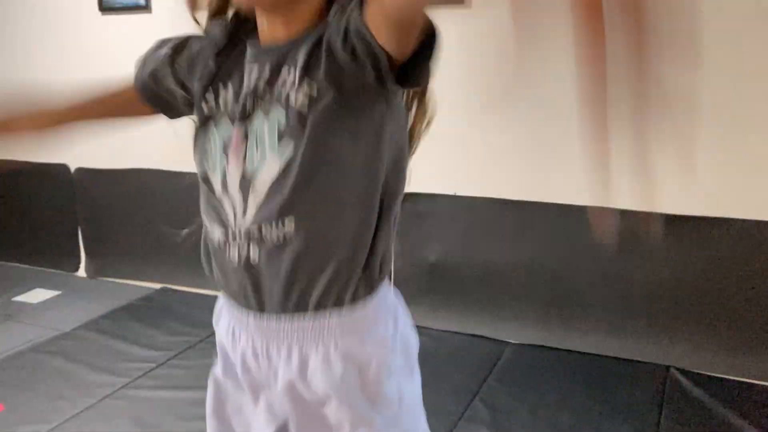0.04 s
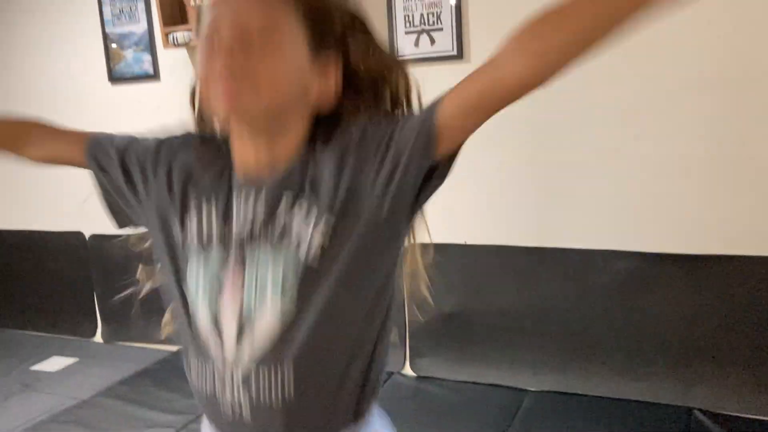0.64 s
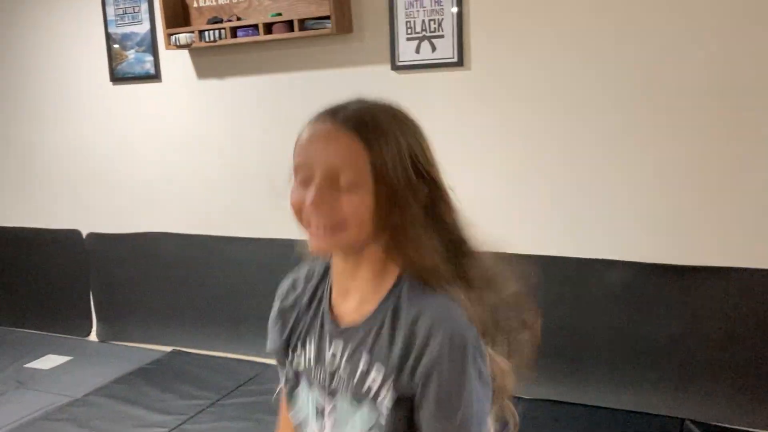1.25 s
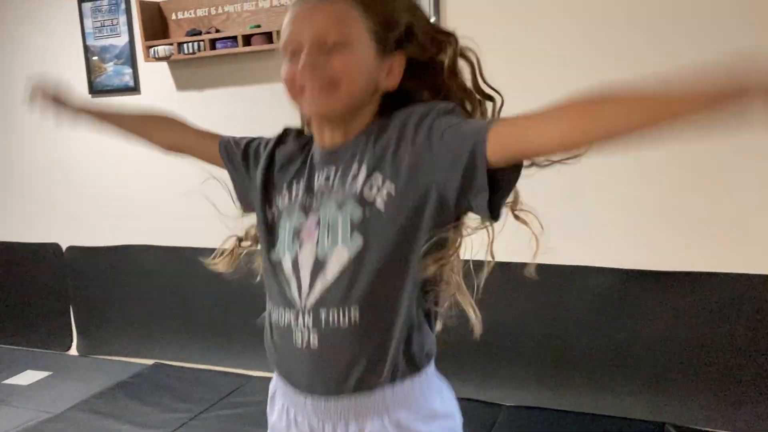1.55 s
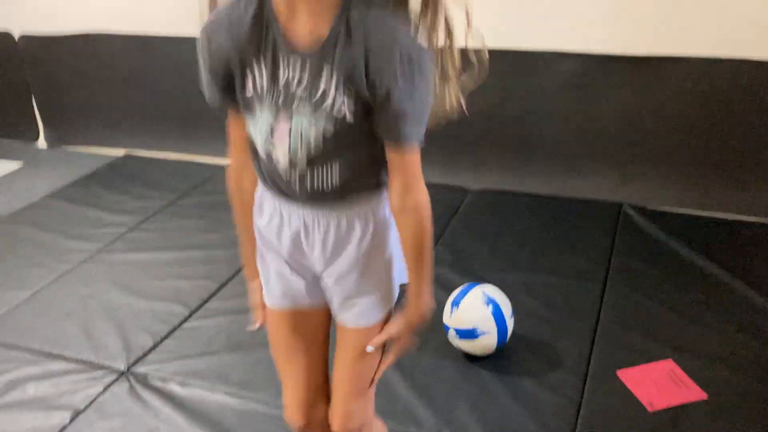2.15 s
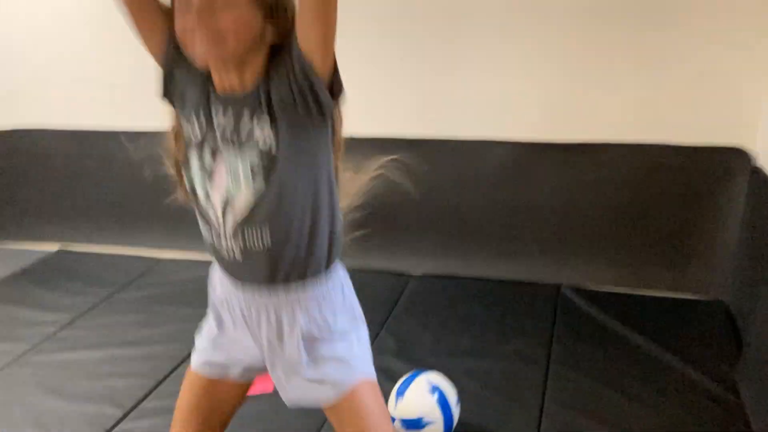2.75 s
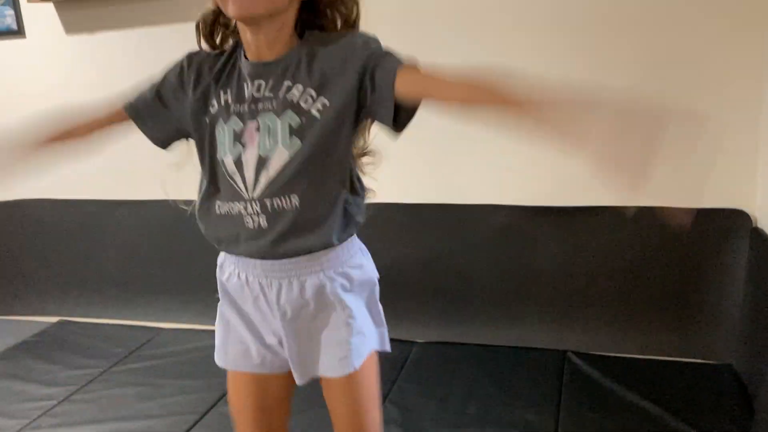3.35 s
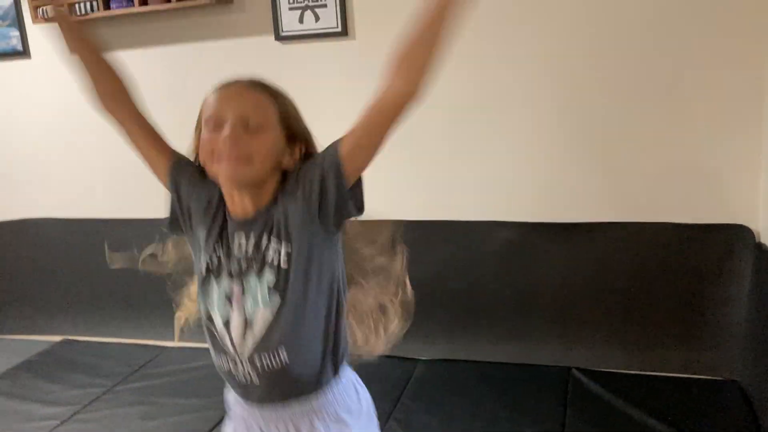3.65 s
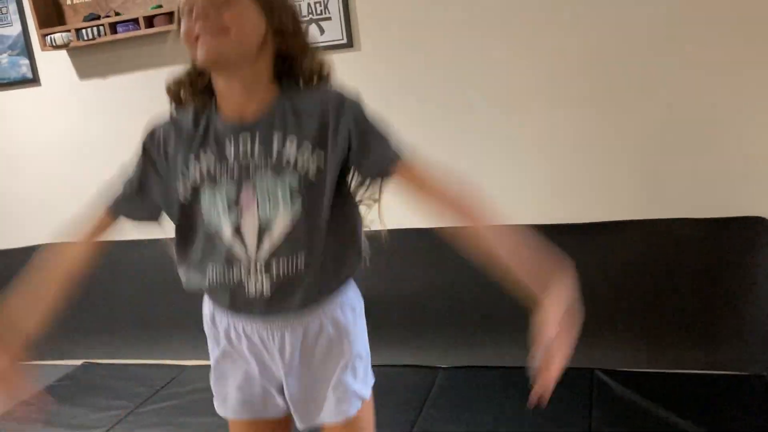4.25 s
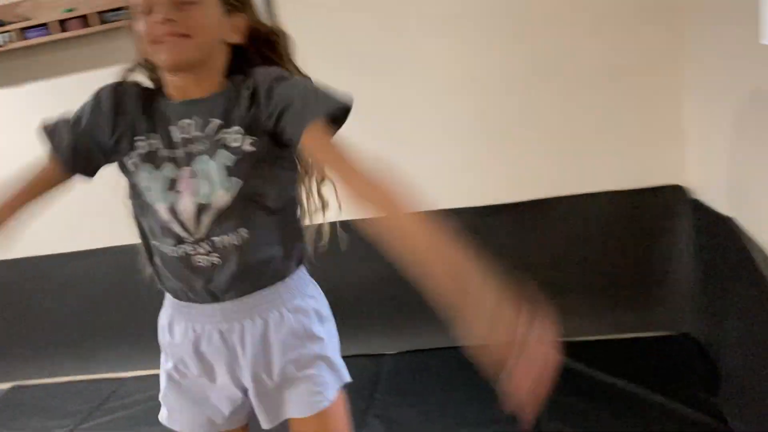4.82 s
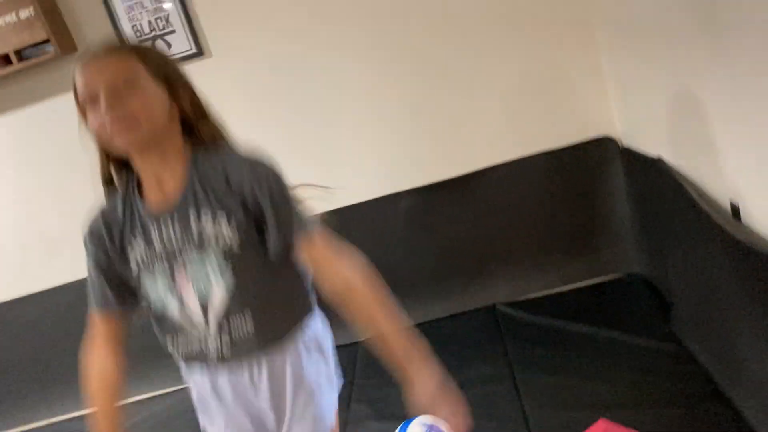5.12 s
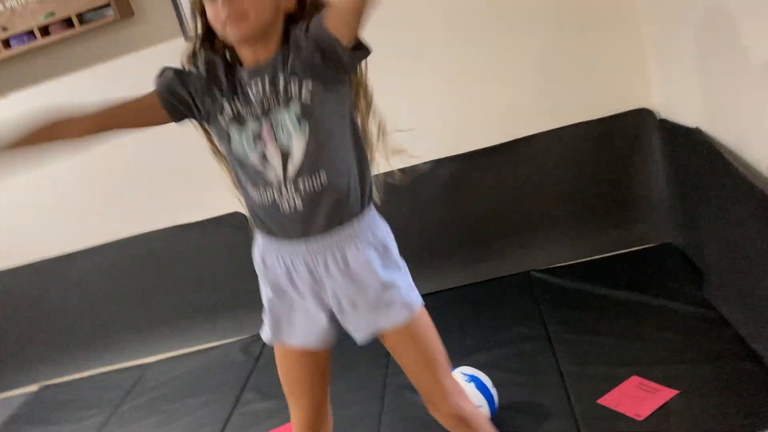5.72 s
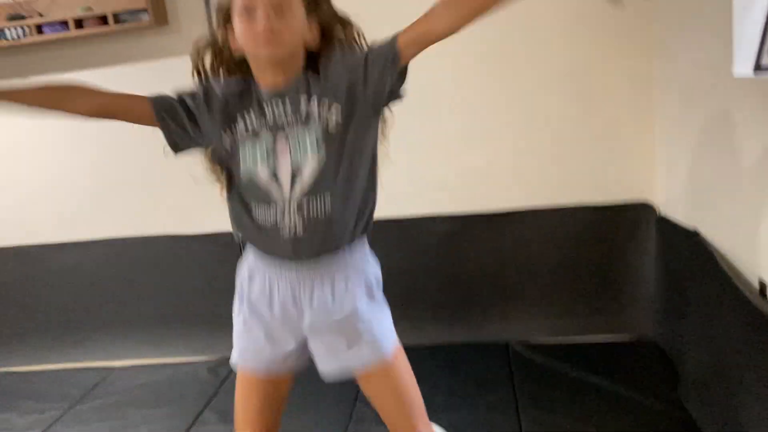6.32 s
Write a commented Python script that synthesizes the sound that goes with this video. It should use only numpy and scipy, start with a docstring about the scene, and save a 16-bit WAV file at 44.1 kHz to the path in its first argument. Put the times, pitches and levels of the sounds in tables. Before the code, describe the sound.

Bare feet thud steadily on padded gym mats during jumping jacks, with hands slapping thighs on every second landing.

```python
"""Bare feet pat on vinyl and thud into foam mats: a child does jumping jacks nearby in a small room.
Each footfall is an impact that sets the foam into a damped oscillation. On every second landing the
hands slap the thighs, and the trapped air resonates. Friction makes shirt and hair swish as the arms
swing, and skin squeak on the vinyl. The walls reverberate briefly over a steady ventilation rumble."""
import sys
import numpy as np
from scipy import signal
from scipy.fft import rfft, irfft, next_fast_len
from scipy.io import wavfile
from scipy.ndimage import uniform_filter1d, map_coordinates

SR = 44100
rng = np.random.default_rng(int(sys.argv[2]) if len(sys.argv) > 2 else 0)


def store_pcm(level_fs):
    """Save levels as 16-bit WAV."""
    pcm = np.round(np.clip(level_fs, -1, 1) * 32767).astype(np.int16)
    wavfile.write(sys.argv[1], SR, np.atleast_2d(pcm).T)


N = 285503

# Levels in the tables are relative; each source applies its own gain.
# Each row: touch in seconds, pat level in dB, treble tilt in dB per decade, roll until the weight
# arrives in seconds, thud level in dB, cushion pitch in Hz.
FOOTFALLS = [(0.003, -33.5, 6, 0.0095, -37.5, 174), (0.237, -38.5, 0, 0.0089, -33, 175),
             (0.257, -23, 6, 0.0084, -28, 194), (0.683, -33, -9.5, 0.01, -29.5, 139),
             (0.7, -34, 0, 0.0056, -29, 164), (0.742, -31, 3.5, 0.0061, -34, 190),
             (0.772, -36.5, 5.5, 0.0077, -34, 190), (1.129, -41, -7.5, 0.0017, -33, 195),
             (1.156, -29, -6, 0.0058, -23, 177), (1.198, -32, -3.5, 0.0028, -40, 166),
             (1.618, -35, 4, 0.0083, -30.5, 202), (1.699, -30.5, 5, 0.013, -22.5, 204),
             (1.732, -33, 4, 0.0018, -38, 236), (2.075, -35, -3, 0.0075, -28.5, 175),
             (2.103, -17.5, 8.5, 0.0019, -27, 292), (2.153, -18.5, -10, 0.0012, -31, 339),
             (2.547, -35.5, 0, 0.019, -28, 126), (2.595, -27.5, 3.5, 0.012, -15.5, 180),
             (2.623, -45.5, -1, 0.0023, -37, 144), (2.651, -33, 4, .002, -33, 220),
             (3.067, -26.5, 6.5, 0.013, -33, 143), (3.094, -24.5, -8, 0.0037, -36.5, 310),
             (3.519, -22.5, -14, 0.0024, -25.5, 160), (3.539, -29.5, 2, 0.0021, -23, 180),
             (3.591, -35, -4.5, 0.0027, -34, 210), (3.633, -32.5, -6, 0.0066, -31.5, 178),
             (4.001, -27, 7, 0.0045, -28, 207), (4.045, -23.5, -5, 0.0036, -32.5, 206),
             (4.378, -31, -7, 0.0024, -39.5, 198), (4.5, -30, 3, 0.0064, -21, 170),
             (4.525, -32.5, 2.5, 0.0022, -25.5, 147), (4.544, -28, 2, 0.0016, -33.5, 187),
             (4.967, -25, 6, 0.0069, -19.5, 197), (4.992, -32, 4, 0.0019, -29.5, 171),
             (5.011, -25, -9, 0.00087, -31, 159), (5.41, -36, -9.5, 0.0029, -32.5, 178),
             (5.446, -30.5, -4, 0.0088, -26.5, 156), (5.494, -32, -1.5, 0.0022, -40.5, 180),
             (5.893, -33, -4.5, 0.0017, -36.5, 187), (5.955, -23, 1.5, 0.0028, -31.5, 318),
             (6.412, -25, -2, 0.011, -21, 155), (6.446, -33.5, 6, 0.0016, -42, 166)]
# Feet apart and together in turn. Each row: time in seconds, mat heave in dB, shirt jolt in dB,
# delay to the fastest arm swing in seconds, shirt on that swing in dB, hair on it in dB.
LANDINGS = [(-0.21, -25, -55, 0.19, -58, -60), (0.249, -29.5, -52.5, .2, -50, -62),
            (0.695, -28, -50, 0.25, -43.5, -60), (1.162, -31, -56, 0.25, -51.5, -63.5),
            (1.63, -32, -52.5, 0.25, -49.5, -53.5), (2.089, -50, -49, 0.24, -47, -64),
            (2.599, -26, -55, 0.22, -46, -55), (3.06, -41, -52, 0.25, -45.5, -64),
            (3.522, -30.5, -47.5, 0.23, -47, -53), (4.006, -41, -56.5, 0.247, -48, -63),
            (4.506, -24.5, -56.5, 0.24, -45.5, -50.5), (4.976, -39, -45.5, 0.23, -45.5, -54.5),
            (5.445, -37, -54, 0.23, -49.5, -59.5), (5.9, -33.5, -53, 0.26, -46.5, -64.5),
            (6.418, -29, -52.5, .24, -50, -57)]
# Hands on thighs and flat soles on vinyl. Each row: start in seconds, level in dB,
# trapped-air resonance in Hz, its height in dB, reverberation in dB.
SKIN_SLAPS = [(0.266, -23, 1790, 11.5, 0), (0.2711, -15.5, 4300, 9, -7.5), (1.1337, -19.5, 8200, 1.5, -1.5),
              (1.155, -6, 2000, 14, -9), (1.158, -8.5, 5030, 14, -4), (1.166, -7, 8440, 17.5, -8),
              (2.1037, -17, 2110, 14.5, -2.5), (2.154, -16, 930, 28, -10.5), (2.157, -21, 3100, -3.5, -6),
              (3.07, -32, 1490, 7.5, -22), (3.079, -29, 1524, 2, -4.5), (3.955, -16.5, 2140, 12, -11.5),
              (3.958, -18.5, 3240, 13, -6), (3.9609, -20, 5650, 14, -13.5), (4.046, -28.5, 1960, 24, -17),
              (4.98, -23.5, 5900, 6, -9), (5.009, -24, 4260, 3.5, -10), (5.025, -33, 8100, 11, -21.5),
              (5.952, -13, 11600, 13, -16), (5.953, -16.5, 2470, 17.5, -10), (5.955, -27.5, 910, 3, -3)]
# Toes, heels and taut folds. Each row: start in seconds, level in dB, pitch in Hz.
TICKS = [(0.688, -29, 472), (0.749, -21.5, 5200), (1.702, -41, 3000), (1.73, -32, 7850),
         (2.597, -29.5, 940), (2.608, -27, 900), (3.519, -29.5, 975), (3.525, -27, 1900),
         (3.613, -31, 3900), (3.632, -27, 1100), (3.633, -32, 4500), (4.003, -29, 1400),
         (4.047, -26.5, 586), (4.126, -33.5, 1530), (4.129, -29.5, 7800), (4.377, -32.5, 740),
         (4.399, -39, 1200), (4.444, -39, 3970), (4.501, -34, 895), (5.097, -26.5, 3960),
         (5.276, -33.5, 1960), (5.502, -33.5, 1500), (5.533, -39, 11000), (5.894, -38.5, 607),
         (5.906, -32, 940)]
# Hair whipping as the arms go overhead. Each row: peak in seconds, level in dB, half length in seconds.
HAIR_WHIPS = [(0.058, -56, 0.029), (0.779, -44.5, 0.028), (1.736, -49, 0.015), (2.037, -66, 0.05),
              (2.512, -65.5, 0.044), (3.53, -58.5, 0.033), (4.538, -63.5, 0.045), (5.413, -50, 0.053)]
# Faint rustle between movements. Each row: time in seconds, level in dB.
RESTING_RUSTLE = [(0.05, -46.5), (0.22, -56.5), (0.6, -84), (1.1, -52), (1.57, -61.5), (2.03, -55.5),
                  (2.5, -67), (2.98, -58.5), (3.45, -62.5), (3.81, -45.5), (3.9, -61), (4.35, -55),
                  (4.85, -54.5), (5.3, -51), (5.85, -59.5), (6.47, -56)]
# Skin dragging on vinyl. Each row: start in seconds, level in dB, pitch in Hz, t60 in seconds.
SKIN_SQUEAKS = [(4.879, -42, 2280, 0.06), (4.924, -51, 1980, 0.11)]
# Faint low tones. Each row: peak in seconds, level in dB, pitch in Hz, half length in seconds.
LOW_TONES = [(1.27, -35.5, 335, 0.003), (4.888, -39.5, 340, 0.0047), (5.676, -46, 205, 0.023),
             (5.869, -41, 188, 0.017)]
# Spectra of the sources. Each row: frequency in Hz, level in dB.
FOAM_SPECTRUM = [(25, -15.5), (60, 11.5), (110, 3.5), (190, -17.5), (270, -24), (340, -3.5), (550, -19.5),
                 (1200, -22), (3000, -86)]
VINYL_SPECTRUM = [(120, 2), (300, 5), (480, 4.5), (650, -6.5), (900, 1.5), (1400, -6), (2100, -7),
                  (3500, -13.5), (8000, -24), (16000, -30.5)]
SKIN_SPECTRUM = [(200, -4), (600, 4), (1200, -5.5), (2000, 0.5), (4500, -5), (7000, -5), (11000, 0),
                 (14000, -9.5), (16500, -21)]
SHIRT_SPECTRUM = [(40, -4.5), (150, 6), (400, 6), (700, 0), (1100, -2.5), (1500, -1), (2100, -2.5),
                  (3500, -9), (7500, -25), (12000, -26), (16000, -37.5)]
HAIR_SPECTRUM = [(1500, -2), (4000, 5), (7300, 10.5), (9000, 9.5), (11500, 7), (15500, -9), (17000, -16.5)]
VENTILATION_SPECTRUM = [(20, -13.5), (45, -4.5), (60, 12.5), (80, -5.5), (200, -11.5), (500, -25),
                        (2000, -29.5), (5000, -40.5), (16000, -55)]
# Reverberation time of the room. Each row: frequency in Hz, t60 in seconds.
WALL_DECAY = [(100, 0.31), (400, 0.28), (1200, 0.25), (3000, 0.42), (8000, 0.41), (15000, 0.31)]
# Likeness of the two channels. Each row: frequency in Hz, left-right correlation.
COHERENCE = [(70, 0.99), (170, 0.77), (400, 0.85), (1000, 0.41), (2200, 0.17), (4500, 0.22), (6500, 0.036),
             (8500, 1), (15000, 0.57)]
# Phase between the microphones. Each row: frequency in Hz, lead of the left in radians.
PHASE_LEAD = [(0, 0), (1800, -.4), (3200, 1.6), (4300, 0), (7200, -.2), (9200, -3.1), (11400, -6.3),
              (13800, -9.4), (16600, -12.6)]

LEAD_IN_S = 0.04  # time allowed for the swell of air before a contact


def foam_thuds(level_db=-2, press_s=0.006, sag=0.027, knock_ratio=2.15, heave_hz=98, wet_db=-6.5):
    """Damped oscillation: loaded foam swings, sinks in pitch and springs back; the whole mat heaves."""
    track, t = np.zeros((2, N)), np.arange(SR // 5) / SR
    push = lambda peak_s: (t / peak_s * np.exp(1 - t / peak_s)) ** 2
    steps = [(s + roll_s, db, pitch_hz) for s, _, _, roll_s, db, pitch_hz in FOOTFALLS]
    rebound_s, rebound_db, rebound_hz = 0.094, -43.5, 200
    rebounds = [(s + rebound_s, rebound_db, rebound_hz) for s, *_ in LANDINGS]
    for s, db, pitch_hz in steps + rebounds:
        glide_hz = pitch_hz * (1 + sag * (np.exp(1 - t / press_s) - 1) / 2)
        cycles = np.cumsum(glide_hz) / SR
        phase = 2 * np.pi * (cycles - np.interp(press_s, t, cycles))  # crests at full pressure
        cushion = push(press_s) * np.cos(phase)
        knock = amp(-11) * push(press_s) ** 2 * np.cos(knock_ratio * phase)
        shudder = amp(-12) * noise(lambda hz: along(FOAM_SPECTRUM, hz), len(t))
        shudder *= burst(t, rise_s=0.0015, t60=0.26)
        add(track, s, amp(db + level_db) * in_room(cushion + knock + shudder, wet_db))
    heave = amp(-2) * push(0.012) * np.cos(2 * np.pi * heave_hz * (t - press_s))
    for s, heave_db, *_ in LANDINGS:
        add(track, s, amp(heave_db + level_db) * in_room(np.array([heave, heave]), wet_db))
    return track * amp([[-1.0], [1.0]])  # slightly to the right


def sole_pats(level_db=-7, arch_hz=480, arch_db=6, scatter_octaves=0.38):
    """Contact time: a slower roll makes a softer, longer pat; the hollow under the arch resonates."""
    track = np.zeros((2, N))
    for s, db, treble_db, roll_s, *_ in FOOTFALLS:
        hollow_hz = arch_hz * 2 ** (scatter_octaves * rng.standard_normal())
        hollow = lambda hz: arch_db * resonance(hz, hollow_hz, octaves=0.27)
        tilt = lambda hz: treble_db * np.log10((hz + 100) / 1000)
        colour = lambda hz: along(VINYL_SPECTRUM, hz) + hollow(hz) + tilt(hz)
        pat = impact(colour, rise_s=0.00075 + 0.18 * roll_s, t60=0.046 + 6.95 * roll_s,
                     squeeze_db=-7.5, squeeze_s=0.004, wet_db=-4, ceiling_db=-8, grit_db=1)
        add(track, s - LEAD_IN_S, amp(db + level_db) * pat)
    return track * amp([[0.5], [-0.5]])  # slightly to the left


def skin_slaps(level_db=-4, firm_db=-11.5, firm_t60=0.016):
    """Cavity resonance: skin cracks against skin or vinyl, and the trapped air colours the crack."""
    track = np.zeros((2, N))
    for s, db, cup_hz, cup_db, wet_db in SKIN_SLAPS:
        colour = lambda hz: along(SKIN_SPECTRUM, hz) + cup_db * resonance(hz, cup_hz, octaves=0.81)
        t60 = firm_t60 * 2 ** ((firm_db - db) / 12)  # a weaker slap glances and lasts longer
        slap = impact(colour, rise_s=0.0001, t60=t60, squeeze_db=-21, squeeze_s=0.003,
                      wet_db=wet_db, ceiling_db=wet_db - 1.5, grit_db=3)
        add(track, s - LEAD_IN_S, amp(db + level_db) * slap)
    return track


def ticks(level_db=-4, ring_db=25, ring_cycles=11):
    """Impulse excitation: toes, heels and taut folds ring a few cycles, so low ticks last longer."""
    track = np.zeros((2, N))
    for s, db, pitch_hz in TICKS:
        colour = lambda hz: along(SKIN_SPECTRUM, hz) + ring_db * resonance(hz, pitch_hz, octaves=1.2)
        tick = impact(colour, rise_s=0.00017, t60=0.0023 + ring_cycles / pitch_hz,
                      squeeze_db=-27, squeeze_s=0.0016, wet_db=-3, ceiling_db=-15, grit_db=0)
        add(track, s - LEAD_IN_S, amp(db + level_db) * tick)
    return track


def impact(colour_db, rise_s, t60, squeeze_db, squeeze_s, wet_db, ceiling_db, grit_db):
    """Impact noise: air is squeezed out, skin meets in tiny cracks, and ceiling and walls reflect it."""
    t = np.arange(SR // 5) / SR - LEAD_IN_S
    squeeze = amp(squeeze_db) * np.exp(-np.abs(t) / squeeze_s)
    envelope = burst(np.maximum(t, 0), rise_s, t60) + squeeze
    crack = noise(lambda hz: colour_db(hz) + ripple(hz), len(t)) * envelope
    crack *= amp(grit_db * wobble(1300, len(t)))
    crack /= np.linalg.norm(crack, axis=1, keepdims=True)
    sound = np.zeros((2, SR // 2))
    add(sound, 0, crack)
    add(sound, 0.0097, amp(ceiling_db) * crack)  # delayed by the longer path via the ceiling
    add(sound, LEAD_IN_S, amp(wet_db) * reverberation(colour_db))
    return np.linalg.norm(envelope) * sound


def ripple(hz, depth_db=4, spacing_hz=289.6):
    """Spectral irregularity: random peaks and dips in dB, as no two contacts have the same shape."""
    return depth_db * map_coordinates(rng.standard_normal(512), [hz / spacing_hz])


def shirt_and_hair(shirt_db=-1.5, hair_db=-3):
    """Friction noise: cloth and hair rub at each landing and arm swing, and the powers add."""
    t = np.arange(N) / SR
    power = lambda db: amp(db) ** 2
    swell = lambda s, half_s: np.exp(-np.minimum(((t - s) / half_s) ** 2, 50))
    shirt_power = power(np.interp(t, *np.transpose(RESTING_RUSTLE)) - 5)
    hair_power = np.full(N, power(-80))
    for s, _, jolt_db, delay_s, shirt_swing_db, hair_swing_db in LANDINGS:
        jolt = power(jolt_db) * swell(s + 0.088, half_s=0.074)  # the shirt drops after the landing
        settle = power(-14.5) * swell(s + delay_s + 0.071, half_s=0.036)
        swing = swell(s + delay_s, half_s=0.035) + settle
        shirt_power += power(shirt_db) * (jolt + power(shirt_swing_db) * swing)
        hair_power += power(hair_db) * (power(-11) * jolt + power(hair_swing_db) * swing)
    for s, whip_db, half_s in HAIR_WHIPS:
        hair_power += power(whip_db + hair_db) * swell(s, half_s)
    creases = np.sqrt(crease_power())
    folds_db = 1.2 * wobble(220) + 0.59 * wobble(35)  # folds catch and let go
    threads_db = 2 * wobble(1800)  # the weave rasps
    texture = unit(creases * amp(folds_db + threads_db))
    shirt = np.sqrt(shirt_power) * noise(lambda hz: along(SHIRT_SPECTRUM, hz), N)
    hair = np.sqrt(hair_power) * noise(lambda hz: along(HAIR_SPECTRUM, hz), N)
    return in_room(colour_drift(texture * (shirt + hair)), wet_db=-8.5)[:, :N]


def crease_power(per_s=110, life_s=0.0009, spread_db=2.5):
    """Poisson process: tiny creases flip at random, adding to steady rubbing of power 1."""
    flips = rng.random(N) < per_s / SR
    flip_db = 1 + spread_db * np.minimum(rng.exponential(size=N), 3)
    decay = np.exp(-1 / (life_s * SR))
    return 1 + signal.lfilter([1], [1, -decay], flips * amp(flip_db) ** 2)


def colour_drift(x, depth_db=3.2):
    """Time-varying filtering: the spectrum drifts at random as the cloth changes shape."""
    spectra = signal.stft(x, nperseg=512)[2]
    drift = uniform_filter1d(rng.standard_normal(spectra.shape[1:]), size=2, axis=0)
    drift = uniform_filter1d(drift, size=6, axis=1)
    return signal.istft(spectra * amp(depth_db * unit(drift)), nperseg=512)[1][:, :N]


def squeaks(width_octaves=0.22, rough_db=4):
    """Stick-slip friction: skin drags on the vinyl in a brief, narrow band of rasping noise."""
    track, t = np.zeros((2, N)), np.arange(SR // 5) / SR
    for s, db, pitch_hz, t60 in SKIN_SQUEAKS:
        colour = lambda hz: -20 * np.log10(1 + (np.log2((hz + 1) / pitch_hz) / width_octaves) ** 2)
        slips = unit(amp(rough_db * wobble(580, len(t))))
        rasp = noise(colour, len(t)) * slips * burst(t, rise_s=0.0004, t60=t60)
        add(track, s, amp(db) * in_room(rasp, wet_db=0))
    return track


def low_tones(fall_octaves_per_s=8.4, rough_db=7):
    """Modulation: short low tones sink in pitch and flutter in level, perhaps a mat flexing."""
    track, t = np.zeros(N), np.arange(N) / SR
    for s, db, pitch_hz, half_s in LOW_TONES:
        glide_hz = pitch_hz * 2 ** np.clip(-fall_octaves_per_s * (t - s), -1, 1)
        envelope = np.exp(-((t - s) / half_s) ** 2 / 2)
        track += amp(db) * envelope * np.sin(2 * np.pi * np.cumsum(glide_hz) / SR)
    track *= unit(amp(rough_db * wobble(170)))
    return in_room(np.array([track, track]), wet_db=-3)[:, :N]


def in_room(sound, wet_db):
    """Convolution: the direct sound is followed by its wall reflections."""
    tail = reverberation(np.zeros_like)  # starts with a flat spectrum
    heard = amp(wet_db) * signal.fftconvolve(sound[:1], tail, axes=1)
    add(heard, 0, sound)
    return heard


def reverberation(colour_db, build_s=0.0015):
    """Diffuse field: a fresh tail of unit energy, in which each frequency decays at its own rate."""
    hz, t, spectra = signal.stft(noise(colour_db, 2 * SR // 5), SR, nperseg=256)
    decay = np.exp(-np.log(1000) * t / along(WALL_DECAY, hz)[:, None])
    build = 1 - np.exp(-t / build_s)
    tail = signal.istft(spectra * decay * build, SR, nperseg=256)[1]
    return tail / np.linalg.norm(tail[0])


def ventilation(level_db=-61.5):
    """Stationary noise: the ventilation rumbles steadily."""
    return amp(level_db) * noise(lambda hz: along(VENTILATION_SPECTRUM, hz), N)


def noise(colour_db, size):
    """Partial coherence: mid and side noise, coloured in dB, form a stereo pair of rms 1."""
    def response(hz):
        angle = np.arccos(np.clip(along(COHERENCE, hz), -1, 1)) / 2
        return amp(colour_db(hz)) * [np.cos(angle), np.sin(angle)]
    mid, side = filtered(rng.standard_normal((2, size)), response)
    return unit(np.array([mid + side, mid - side]))


def filtered(x, response):
    """Linear filtering: the spectrum is multiplied by a frequency response."""
    size = x.shape[-1]
    padded = next_fast_len(size + 1024, True)
    hz = np.fft.rfftfreq(padded, 1 / SR)
    return irfft(rfft(x, padded) * response(hz), padded)[..., :size]


def resonance(hz, centre_hz, octaves):
    """A resonance peak of height 1 on a log frequency axis."""
    return np.exp(-(np.log2((hz + 1) / centre_hz) / octaves) ** 2)


def burst(t, rise_s, t60):
    """Exponential decay, 60 dB in t60 seconds, with a quick rise."""
    return (1 - np.exp(-t / rise_s)) * np.exp(-np.log(1000) * t / t60)


def wobble(knots_per_s, size=N):
    """A smooth curve through random knots."""
    knots = rng.standard_normal(int(size * knots_per_s / SR) + 4)
    return map_coordinates(knots, [np.arange(size) * knots_per_s / SR])


def along(points, hz):
    """Interpolation of (Hz, value) points on a log frequency axis."""
    knots_hz, values = np.transpose(points)
    return np.interp(np.log(hz + 1), np.log(knots_hz + 1), values)


def amp(db):
    """Decibels to amplitude gain."""
    return 10 ** (np.asarray(db) / 20)


def unit(x):
    """Normalisation to rms 1."""
    return x / np.sqrt(np.mean(x ** 2) + 1e-20)


def add(track, s, sound):
    """Mix a sound into the track at s seconds."""
    start = round(s * SR)
    sound = sound[..., max(-start, 0):]
    part = track[:, max(start, 0):][:, :sound.shape[-1]]
    part += sound[..., :part.shape[-1]]


def scene():
    """Superposition: the pressures of all sources in the room add."""
    contacts = foam_thuds() + sole_pats() + skin_slaps() + ticks()
    return contacts + shirt_and_hair() + squeaks() + low_tones() + ventilation()


def record(dry, low_cut_hz=42, top_hz=16600):
    """Band limiting: the microphones lose deep bass and top treble, and differ in treble phase."""
    def response(hz):
        low_cut = (1j * hz) ** 2 / (low_cut_hz ** 2 - hz ** 2 + 1j * np.sqrt(2) * hz * low_cut_hz)
        half_lead = np.interp(hz, *np.transpose(PHASE_LEAD)) / 2
        return low_cut * np.exp(1j * np.array([half_lead, -half_lead])) * (hz < top_hz)
    return filtered(dry, response)


dry = scene()
out = record(dry)
store_pcm(out)
```